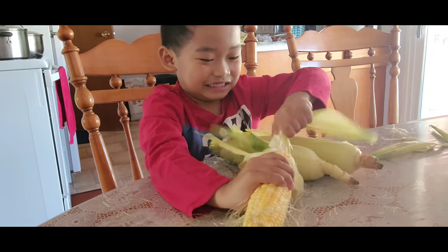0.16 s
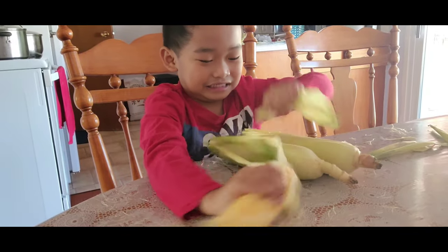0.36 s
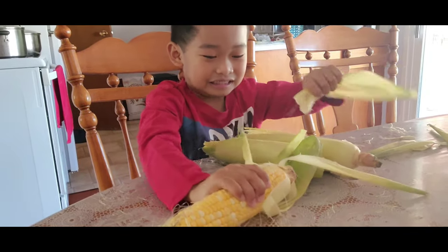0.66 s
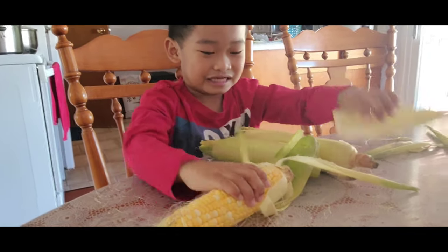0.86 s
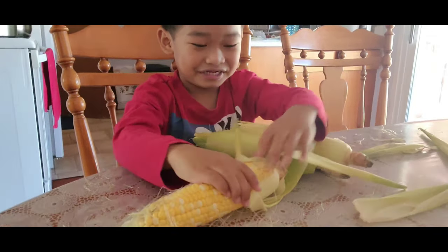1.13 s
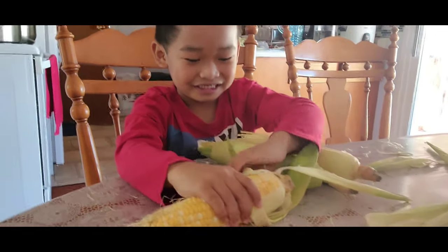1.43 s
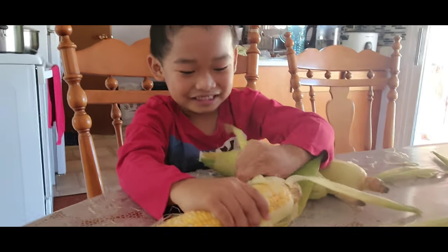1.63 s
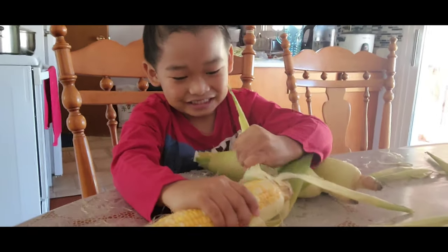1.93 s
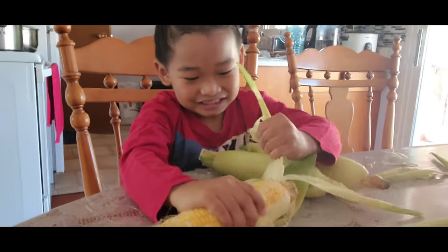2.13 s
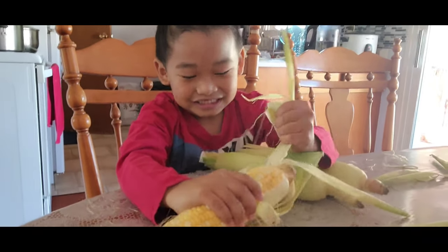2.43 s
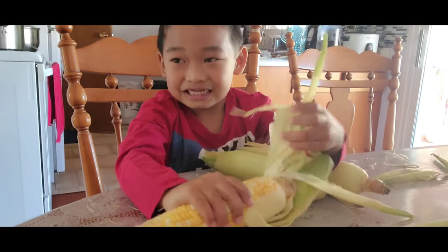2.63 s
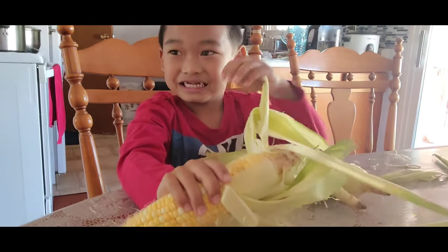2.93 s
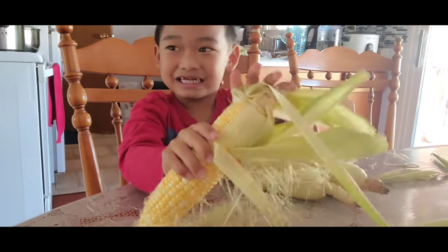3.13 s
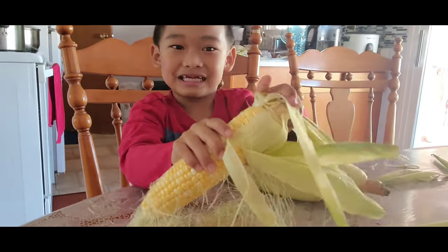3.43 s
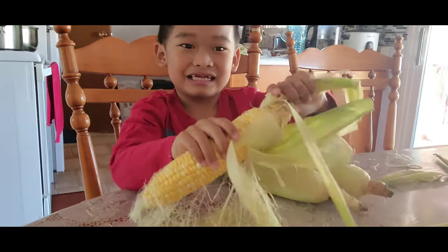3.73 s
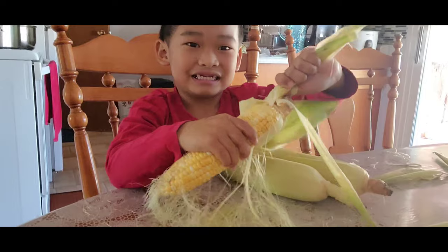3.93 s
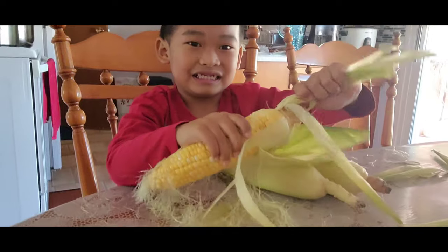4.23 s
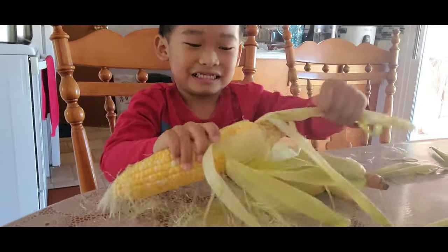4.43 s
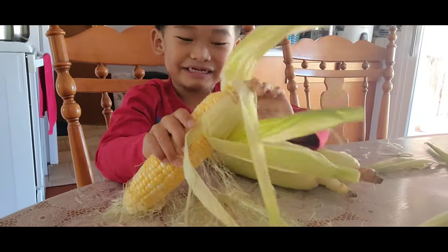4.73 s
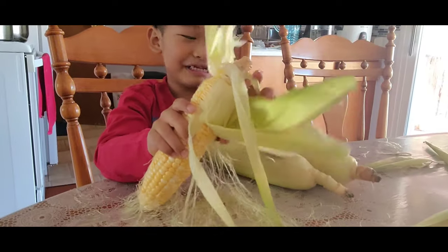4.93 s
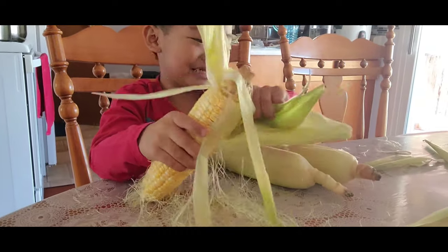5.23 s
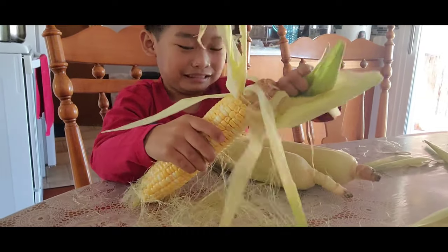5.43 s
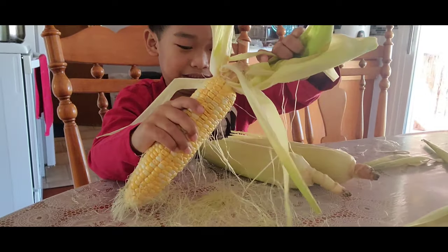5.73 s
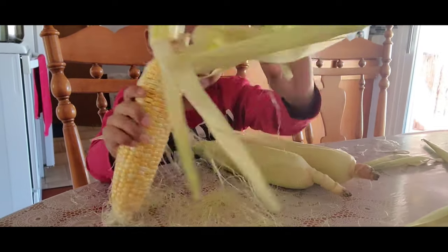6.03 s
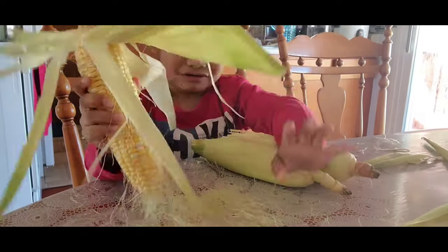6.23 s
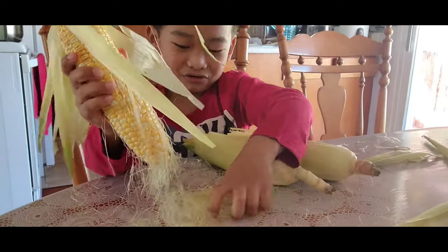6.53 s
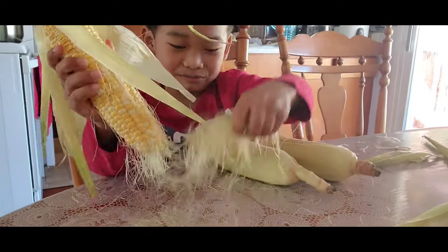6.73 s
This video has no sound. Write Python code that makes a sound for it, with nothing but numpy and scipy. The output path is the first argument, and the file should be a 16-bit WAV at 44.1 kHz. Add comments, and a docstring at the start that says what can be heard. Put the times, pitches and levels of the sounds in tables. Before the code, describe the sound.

Fresh corn husks are tugged and ripped off a cob by hand, with crisp fibre snaps, leafy rustling and light table knocks over a faint hum.

```python
"""Fresh corn husks are pulled off a cob on a kitchen table, close by, while a fridge hums throughout.
First come soft rustles and a few snaps; just before 2 s a hard pull rips many fibres in a row.
Lighter tugs follow, the cob knocks and slides on the table near 3.4 s, and crackle thickens around 4 s.
After 5 s a second strong rip comes with squeaks; then the tugs grow soft and the cob knocks once more.
Snaps are ringing sines with noisy fraying, rustle and creak are shaped crackle, and the room echoes briefly."""
import sys
import numpy as np
from scipy import signal
from scipy.fft import rfft, irfft, next_fast_len
from scipy.io import wavfile
from scipy.ndimage import uniform_filter1d, map_coordinates

SR = 44100
rng = np.random.default_rng(int(sys.argv[2]) if len(sys.argv) > 2 else 0)


def master(y):
    """Save y as 16-bit WAV."""
    cut = np.clip(np.atleast_2d(y).T, -1, 1)
    pcm = np.round(cut * 32767)  # scale
    wavfile.write(sys.argv[1], SR, pcm.astype(np.int16))


def boost_factor(decibels):
    """Convert a level in decibels to a linear amplitude factor."""
    exponent = np.asarray(decibels, float) / 20
    return 10 ** exponent


N = 302526  # length in samples


def unit(x):
    """Scales x to an rms of 1."""
    return x / np.sqrt(np.mean(x ** 2) + 1e-20)


def along(points, hz):
    """Reads a curve of (Hz, value) points on a log frequency axis."""
    f, v = np.transpose(points)
    return np.interp(np.log(hz + 1), np.log(f + 1), v)


def curves(rows):
    """Gives one value per sample for each column after the time."""
    s, *columns = np.transpose(rows)
    return [np.interp(np.arange(N) / SR, s, column) for column in columns]


def wobble(rate):
    """A smooth random curve with rate knots a second, at most 400."""
    knots = rng.standard_normal(int(N * 400 / SR) + 4)
    return map_coordinates(knots, [np.arange(N) * min(rate, 400) / SR])


def filtered(x, response):
    """Multiplies the spectrum of x by a response, a function of frequency in Hz."""
    n = x.shape[-1]
    size = next_fast_len(n + min(4096, n // 4))
    return irfft(rfft(x, size) * response(np.fft.rfftfreq(size, 1 / SR)), size)[..., :n]


def pair(a, b, alike):
    """Left and right from a shared and an opposed signal, alike as given per frequency."""
    def mix(hz):
        turn = np.arccos(np.clip(along(alike, hz), -1, 1)) / 2
        return np.array([np.cos(turn), np.sin(turn)])
    mid, side = filtered(np.array([a, b]), mix)
    return np.array([mid + side, mid - side])


def crackle(count, per_s, spread_db, hiss):
    """Sparse micro-breaks of very uneven size over a finer hiss, count samples long."""
    chance, sign, size = rng.random((3, count))
    ticks = (chance < per_s / SR) * np.sign(sign - .5) * boost_factor(-spread_db * np.log(size + 0.0023))
    return unit(unit(ticks) + hiss * rng.standard_normal(count))


def ring(t, hz, t60):
    """A sine that starts at t = 0 and falls 60 dB in t60 seconds."""
    return np.sin(2 * np.pi * hz * t) * boost_factor(-60 * np.abs(t) / t60) * (t >= 0)


def patches(x, patchy_db):
    """Uneven texture: random narrow bands swell and fade for some tens of ms."""
    z = signal.stft(x, nperseg=512)[2]
    field = uniform_filter1d(rng.standard_normal(z.shape[-2:]), size=2, axis=0)
    field = uniform_filter1d(field, size=5, axis=1)
    return signal.istft(z * boost_factor(patchy_db * unit(field)), nperseg=512)[1][..., :x.shape[-1]]


def swells(start, hold, db, rise, fade, rest_db):
    """Gain per event on a millisecond grid: it rises, holds and fades at steady dB per s; a last row rests."""
    t = np.arange(0, N / SR + .002, .001)
    end = (start + np.abs(hold))[:, None]
    start = start[:, None]
    level_db = db[:, None] - rise * np.maximum(start - t, 0) - fade * np.maximum(t - end, 0)
    return boost_factor(np.vstack([level_db, np.full(len(t), rest_db)]))


def summed(rows):
    """Adds millisecond gains as powers and gives one value per sample."""
    total = np.sqrt(np.sum(rows ** 2, 0))
    return np.interp(np.arange(N) / SR * 1000, np.arange(rows.shape[1]), total)


# The clearest breaking fibres. Each row: time of the break in seconds, relative level in dB,
# main ring in Hz, second ring in Hz, treble setting in dB relative to the snap.
SNAPS = [(.1316, -45.5, 7150, 2920, 3), (.336, -47, 5900, 2980, 2), (.4315, -35.5, 3900, 2300, 3.5),
         (.4712, -18.5, 3510, 5800, 3.5), (.6229, -30, 2730, 1700, -21), (.6369, -34.5, 3020, 595, -19),
         (.856, -51.5, 5500, 2500, -5), (.871, -55, 4500, 2500, 4), (1.0847, -37.5, 3700, 1400, 2),
         (1.1043, -38.5, 1380, 2980, -15), (1.6247, -31, 1390, 567, -36), (1.6777, -33.5, 1570, 3320, -18),
         (1.7161, -25.5, 1060, 3020, -30), (1.7425, -12, 1700, 2520, -15), (1.7477, -14.5, 1880, 870, -15),
         (1.7687, -18.5, 2880, 1500, -34), (1.872, -37.5, 3000, 1450, -22), (1.8855, -33, 3140, 2090, -9),
         (1.914, -41.5, 3160, 1400, -4), (1.9563, -30, 1510, 1010, -5), (1.976, -13.5, 1200, 3400, -17),
         (1.9839, -12.5, 1200, 3420, -11), (1.9923, -15.5, 1190, 3520, -11), (2.002, -15, 1400, 3510, -9),
         (2.0108, -13.5, 1214, 3470, -30), (2.0193, -19, 3060, 1250, -24), (2.0337, -16.5, 1480, 974, -30),
         (2.0432, -15.5, 1440, 930, -17), (2.0479, -13.5, 1510, 2960, -20), (2.071, -22, 1523, 980, -5),
         (2.0879, -18, 3400, 5200, -7), (2.098, -12, 3270, 5050, -5.5), (2.1214, -23, 1430, 4800, -20),
         (2.1337, -26, 3500, 2100, -10), (2.3275, -30.5, 3920, 6700, 8.5), (2.4544, -40.5, 3360, 4880, -5),
         (2.7029, -37, 3240, 600, -24), (2.7437, -33, 3270, 5840, -7.5), (2.8178, -45, 3110, 5400, -17),
         (2.9176, -42, 4600, 590, -17), (3.1352, -37.5, 2970, 4700, 0), (3.5282, -33, 590, 2210, -9.5),
         (3.68, -39.5, 5000, 2300, -23), (3.7403, -37, 3120, 5300, -20), (3.7525, -28.5, 3400, 6500, -5),
         (3.8692, -34, 2910, 2040, -22), (3.9425, -33.5, 2180, 594, -28), (3.9741, -21.5, 3900, 2440, 4),
         (4.0204, -29.5, 5440, 2000, 2), (4.065, -35.5, 3020, 5800, -10.5), (4.099, -25, 6300, 2400, -7),
         (4.1356, -32.5, 4030, 2500, 6), (4.1497, -25.5, 6000, 2860, -2), (4.2041, -30.5, 5570, 690, -1.5),
         (4.4458, -32, 2516, 1610, -8.5), (4.5008, -37, 5640, 3340, -6), (4.5745, -34.5, 3420, 5950, -10),
         (4.7219, -42.5, 1180, 1960, -1), (4.9278, -51, 4060, 596, -32), (5.0257, -36, 5900, 3280, -6),
         (5.1286, -37.5, 4300, 1880, -30), (5.3022, -19, 3060, 2120, -29), (5.3153, -16.5, 2860, 1970, -30),
         (5.3216, -17, 3800, 974, -29), (5.3731, -31, 2950, 1910, 2), (5.407, -25, 5900, 3900, -22),
         (5.4197, -10.5, 3240, 6100, 4.5), (5.478, -32, 2160, 3250, -9), (5.519, -22.5, 3030, 2060, -3),
         (5.5573, -38, 590, 890, -25), (5.5627, -31, 4340, 1980, -4), (5.607, -12.5, 3400, 2050, -7.5),
         (5.616, -27.5, 3370, 1830, 1), (5.6434, -24, 4830, 3150, -4), (5.6638, -11, 2510, 5300, -9.5),
         (5.6809, -24.5, 2100, 5280, -8), (5.754, -29, 3150, 4740, -5), (5.7993, -24.5, 2960, 4630, -5.5),
         (5.8208, -29.5, 1880, 3240, -2.5), (5.8359, -37, 1900, 4230, 8), (5.9089, -27, 1940, 3880, 1),
         (5.9723, -43, 4090, 2000, -8), (6.0272, -34, 3400, 2210, -28), (6.1177, -33, 2850, 840, -14),
         (6.248, -34.5, 1580, 3570, 6), (6.462, -51, 4410, 2810, -7), (6.5584, -46, 2880, 5860, -8)]
# Hands moving sideways. Each row: time in seconds, delay of the left ear in samples (negative is earlier).
LAG = [(0, 0), (4.8, 0), (5.2, -3), (6.86, -2)]


def snaps():
    """Each fibre rings a few cycles at two pitches, jolts the cob, cracks in the treble and frays on."""
    out = np.zeros((2, N + SR))
    lead = .003  # seconds kept before the break, in which the fraying swells
    t = np.arange(SR // 14) / SR - lead
    lags = curves(LAG)[0]
    for s, db, hz, second_hz, treble_db in list(SNAPS) + small_breaks(count=45):
        body = ring(t, hz, 7 / hz + 0.0021)
        body = body + 0.26 * ring(t, second_hz, 6 / second_hz + 0.0031)
        body = body + 0.036 * ring(t, 575, 0.015)  # the jolted cob
        body = body * (1 - np.exp(-np.abs(t) * hz * 1.96))  # the first half cycle is the weaker one
        body = body + 0.15 * ring(t, 3930, 0.0042)  # the break itself is one broad click

        treble = filtered(rng.standard_normal((2, len(t))), lambda f: f > 6500)
        crack = treble * boost_factor(-60 * np.abs(t) / 0.015) * (t > -.0005)

        def colour(f):
            """Leaf rustle plus peaks at the two rings."""
            first, second = [1 / (1 + ((f - c) / (0.1 * c)) ** 2) for c in (hz, second_hz)]
            return boost_factor(along(LEAF, f) + treble_db * 0.98) + first ** 0.77 + second ** 1.92

        shreds = [crackle(count=len(t), per_s=520, spread_db=6.5, hiss=1.0) for _ in range(2)]
        fade = np.where(t > 0, boost_factor(-60 * t / 0.047), boost_factor(60 * t / 0.0027))
        fray = unit(filtered(pair(*shreds, NEAR), colour)) * fade

        both = boost_factor(1.5) * body + boost_factor(treble_db - 7) * crack + boost_factor(-9) * fray
        at = round((s - lead) * SR)
        for ear, shift in enumerate((round(lags[at]), 0)):
            out[ear, at + shift:][:len(t)] += boost_factor(db) * both[ear]
    return filtered(out[:, :N], lambda f: 1 / (1 + (330 / (f + 1)) ** 4))  # thin leaves radiate no bass


def small_breaks(count):
    """Lesser fibres part at chance moments, more often and louder under a strong tug."""
    rustle = pull()[0]
    chance, spread = rng.random(count), rng.standard_normal((count, 4))
    share = np.cumsum(np.sqrt(rustle))
    at = np.clip(np.searchsorted(share, chance * share[-1]), 400, N - 1)
    db = 20 * np.log10(rustle[at]) + 12 + 3 * spread[:, 2]
    hz = 2720 * np.exp(.35 * spread[:, :2])
    treble_db = -12.5 + 6 * spread[:, 3]
    return list(zip(at / SR, db, hz[:, 0], 0.56 * hz[:, 1], treble_db))


# Colour of rustling leaves. Each row: frequency in Hz, relative level in dB per Hz.
LEAF = [(880, -11), (1500, -14), (2490, -4), (2740, -2.5), (3000, 0.5), (3620, -3.5), (5600, -3),
        (7240, -6.5), (14800, -12), (16000, -20)]
# Stereo width of husk sounds. Each row: frequency in Hz, left-right likeness (1 is the same in both).
NEAR = [(400, 0.79), (1400, 0.17), (3100, 0.31), (7000, 0.018)]


def husk():
    """Leaves rustle and the stalk end creaks while the hand pulls, both in clumps of tiny breaks."""
    rustle_gain, creak_gain, centre_hz = pull()
    clumps = wobble(45)

    def grains(per_s):
        """Patchy stereo crackle."""
        two = [crackle(count=N, per_s=per_s, spread_db=1, hiss=0.99) for _ in range(2)]
        return patches(pair(*two, NEAR), patchy_db=3.5)

    rustle = unit(filtered(grains(per_s=1500), lambda hz: boost_factor(along(LEAF, hz))))
    creak = unit(creaking(grains(per_s=400), centre_hz))
    rustle = rustle_gain * boost_factor(4.0 + 2.03 * clumps + 1.14 * wobble(120)) * rustle
    return rustle + creak_gain * boost_factor(2.1 * clumps + 0.64 * wobble(59)) * creak


# Colour of the stalk's creak. Each row: multiple of its resonance, relative level in dB per Hz.
STALK = [(.15, -59), (.3, -14), (.6, -7), (.85, -1.5), (1.05, -2), (1.4, -7), (2.1, -6.5), (2.8, -16),
         (5, -76)]


def creaking(x, centre_hz):
    """The stalk end's resonance slides as the husk round it opens."""
    hz, t, z = signal.stft(x, SR, nperseg=512)
    multiple, db = np.transpose(STALK)
    centre = centre_hz[np.minimum((t * SR).astype(int), N - 1)]
    gain = boost_factor(np.interp(np.log(hz[:, None] / centre + 1e-3), np.log(multiple), db))
    gain /= np.sqrt(np.mean(gain ** 2, axis=0))  # sliding leaves the overall gain alone
    return signal.istft(z * gain, SR, nperseg=512)[1][:, :N]


# Tugs of the hand. Each row: start in seconds, hold in seconds, leaf rustle setting in dB,
# stalk creak setting in dB, creak resonance in Hz.
TUGS = [(0, 0.16, -67, -71, 1590), (0.194, .22, -60.5, -68, 2100), (0.437, .025, -57, -75, 1800),
        (0.464, .04, -48, -49, 1630), (0.527, .12, -56, -55, 1580), (0.861, .2, -73, -70.5, 1550),
        (1.085, 0.029, -55.5, -57, 1350), (1.293, 0.07, -70, -59.5, 1490), (1.47, 0.049, -66, -59, 1700),
        (1.564, .05, -71, -64.5, 1697), (1.623, .04, -65, -54.5, 1406), (1.671, .055, -60.5, -50.5, 1350),
        (1.738, 0.025, -42, -36.5, 1480), (1.782, 0.023, -57, -54, 1600), (1.834, .13, -62, -53, 1600),
        (1.973, .04, -42, -40, 1340), (2.041, 0.023, -47, -41, 1410), (2.082, .02, -41.5, -38, 1490),
        (2.113, .025, -47, -44.5, 1450), (2.147, .05, -55.5, -67, 1550), (2.212, 0.089, -64.5, -65, 1500),
        (2.318, .025, -53.5, -73, 1870), (2.443, .03, -64.5, -66, 1800), (2.697, .025, -62, -68, 1800),
        (2.737, .075, -59, -71, 2400), (2.842, .04, -69, -73, 1600), (3.132, 0.027, -59.5, -64.5, 1710),
        (3.22, .055, -60.5, -67, 1720), (3.327, 0.12, -73.5, -66.5, 830), (3.506, 0.032, -62.5, -59.5, 940),
        (3.667, 0.028, -55, -55, 1910), (3.739, .035, -53, -53.5, 1610), (3.838, .08, -53, -56, 1800),
        (3.957, .07, -51, -55, 1900), (4.094, .11, -56.5, -62, 1500), (4.313, .29, -58, -61, 1700),
        (4.616, .06, -66.5, -68.5, 1790), (4.713, .025, -72, -67, 1120), (4.933, 0.039, -68.5, -70, 1730),
        (5, .07, -65, -64, 1580), (5.08, 0.025, -59.5, -59, 1760), (5.145, .14, -65.5, -63, 1550),
        (5.294, .025, -48.5, -44.5, 1940), (5.328, .07, -54, -52, 1600), (5.407, .09, -47, -47, 1800),
        (5.536, .07, -54, -51.5, 1510), (5.604, 0.023, -45.5, -43, 1990), (5.66, .04, -54.5, -57, 2090),
        (5.724, .05, -59, -76, 1950), (5.789, .05, -54.5, -62, 1950), (5.902, .035, -58.5, -74, 1950),
        (6.022, 0.12, -60, -58.5, 1920), (6.159, .11, -55, -55, 1940), (6.42, .12, -77.5, -75, 1106),
        (6.572, 0.074, -71, -73, 1500), (6.663, .04, -74, -62.5, 780)]


def pull():
    """Rustle gain, creak gain and creak resonance from the tugs; louder tugs weigh more in the resonance."""
    start, hold, rustle_db, creak_db, hz = np.transpose(TUGS)
    # soft tugs swell, hard ones rip at once: a tug at -55 dB sets in at 900 dB per s
    grip = 900 * boost_factor(0.55 * (np.maximum(rustle_db, creak_db) + 55))[:, None]
    # the resting levels are leaves settling between tugs
    rustle = swells(start, hold, rustle_db, grip, fade=258, rest_db=-79.5)
    creak = swells(start, hold, creak_db, grip, fade=336.5, rest_db=-73.5)
    rest_hz = 1600
    weighted = summed(creak * np.sqrt(np.append(hz, rest_hz))[:, None])
    centre_hz = weighted ** 2 / summed(creak) ** 2
    return summed(rustle), summed(creak), centre_hz


# Wet leaf slipping on leaf. Each row: start in seconds, hold in seconds, level in dB, resonance in Hz.
SQUEAKS = [(5.818, 0.024, -47.5, 2000), (5.908, 0.013, -46.5, 1900), (5.315, 0.013, -41.5, 980)]


def squeaks():
    """Short rubs that excite one narrow resonance of the leaf."""
    out = np.zeros(N)
    for s, hold, db, centre_hz in SQUEAKS:
        rub = filtered(rng.standard_normal(N), lambda hz: 1 / (1 + ((hz - centre_hz) / 170) ** 2))
        event = np.array([[s], [hold], [db]])
        out += unit(rub) * summed(swells(*event, rise=3000, fade=900, rest_db=-150))
    return out


# The cob hits the table. Each row: time in seconds, relative level in dB.
KNOCKS = [(0.47, -37), (2.089, -36), (3.5155, -26), (3.748, -45), (3.939, -41.5), (4.72, -44), (6.67, -39)]
# Ringing of the table top. Each row: frequency in Hz, typical level in dB, seconds to fall by 60 dB.
TABLE = [(123, -3, 0.079), (227.6, -4, 0.093), (270, 1.5, 0.036), (348, -5.5, 0.1), (430, -4, 0.055),
         (590, -4.5, 0.061), (702, -7, 0.045)]


def knocks():
    """Each knock rings the modes of the wooden top, at new strengths each time."""
    out, t = np.zeros(N + SR), np.arange(SR // 4) / SR
    for s, db in KNOCKS:
        modes = sum(boost_factor(level + rng.normal(0, 3.3)) * ring(t, hz, t60) for hz, level, t60 in TABLE)
        out[round(s * SR):][:len(t)] += boost_factor(db - 7.5) * modes * (1 - np.exp(-t / 0.0015))  # soft onset
    return out[:N]


# The cob slides on the table. Each row: time in seconds, typical level in dB, typical slips per second.
DRAG = [(3.3, -64, 47.5), (3.39, -48.5, 52), (3.44, -51, 78), (3.49, -76, 58)]


def drag():
    """The cob judders along the top in uneven slips, each ringing a short hollow note."""
    drag_db, rate = curves(DRAG)
    t = np.arange(N) / SR
    count = np.floor(np.cumsum(rate * (1 + 0.43 * wobble(30))) / SR)
    slips = np.diff(count, prepend=0) * (t > DRAG[0][0]) * (t < DRAG[-1][0])
    short = t[:SR // 20]
    note = ring(short, 822, 0.053) + 0.3 * ring(short, 930, 0.034) + ring(short, 325, 0.027)
    return signal.fftconvolve(slips * boost_factor(drag_db + 1.7 * wobble(70)), note)[:N]


# The table is nudged and shakes slowly. Each row: time of the peak in seconds, typical level in dB.
SWAY = [(.55, -40.5), (1.36, -71), (2.27, -52), (2.88, -52), (3.55, -68), (4.25, -73), (4.79, -61.5),
        (5.28, -61), (6.17, -53), (6.78, -72)]


def table_sway():
    """The swaying table is very low noise, strongest just under 30 Hz, that swells at each nudge."""
    rumble = unit(filtered(rng.standard_normal(N), lambda hz: hz ** 2 / (1 + (hz / 30) ** 6)))
    peak_s, db = np.transpose(SWAY)
    return summed(swells(peak_s, 0 * peak_s, db, rise=213, fade=93, rest_db=-71)) * rumble


# How long the kitchen echoes. Each row: frequency in Hz, seconds to fall by 60 dB.
KITCHEN = [(200, 0.48), (2000, 0.32), (12000, 0.18)]
# Stereo width of the echo and the air. Each row: frequency in Hz, left-right likeness.
ALIKE = [(60, 0.97), (180, 0.85), (550, 0.44), (1650, 0.091), (4970, 0.02), (15000, 0.099)]


def room(x):
    """The echo is fading noise, each frequency at its own speed, drawn anew every third of a second."""
    out, step = np.zeros((2, N + SR)), SR // 3
    for at in range(0, N, step):
        hz, t, z = signal.stft(pair(*rng.standard_normal((2, SR // 2)), ALIKE), SR, nperseg=256)
        tail = signal.istft(z * boost_factor(-60 * t / along(KITCHEN, hz)[:, None]), SR, nperseg=256)[1]
        wet = signal.fftconvolve(x[None, at:at + step], tail / np.linalg.norm(tail[0]), axes=1)
        out[:, at + 150:][:, :wet.shape[1]] += wet  # 150 samples after the direct sound
    return out[:, :N]


# Colour of the kitchen air. Each row: frequency in Hz, relative level in dB per Hz.
HUM = [(24, -23.5), (40, -12), (80, -3), (115, -8), (160, -9.5), (312, -5), (500, -12.5), (663, -21),
       (810, -12), (930, -20.5), (1550, -37.5), (2200, -34), (6000, -42), (16000, -38)]
# Fridge compressor tones. Each row: frequency in Hz, typical peak level in dB.
FRIDGE = [(64, -66.5), (120, -73.5), (179, -68)]


def kitchen_air():
    """Broad hum of the room is shaped noise; the compressor adds tones of unsteady level and phase."""
    noise = patches(pair(*rng.standard_normal((2, N)), ALIKE), patchy_db=2.0)
    air = boost_factor(-59.5 + wobble(3.41)) * unit(filtered(noise, lambda hz: boost_factor(along(HUM, hz))))
    t = np.arange(N) / SR
    for hz, db in FRIDGE:
        air = air + boost_factor(db + 5.2 * wobble(7)) * np.sin(2 * np.pi * hz * t + 0.45 * wobble(7.1))
    return air


def scene():
    """Husk and table close by, the room behind them, the kitchen air under all."""
    wood, breaks = knocks() + drag(), snaps()
    near = breaks + squeaks() + husk() + wood * boost_factor([[-.7], [.7]])  # left, right in dB
    sent = boost_factor(-10) * breaks.mean(0) + boost_factor(-6) * wood
    background = (table_sway() + kitchen_air()) * boost_factor([[-.8], [.8]])
    return near + room(sent) + background


def top_cut(x):
    """Nothing passes above the cut-off."""
    return signal.sosfilt(signal.butter(12, 16600, fs=SR, output="sos"), x)


def record(dry):
    """The microphone rolls off steeply at the very top, around 15 kHz."""
    heard = filtered(dry, lambda hz: 1 / (1 + (hz / 15300) ** 40))
    return top_cut(heard)


dry = scene()
out = record(dry)
master(out)
```